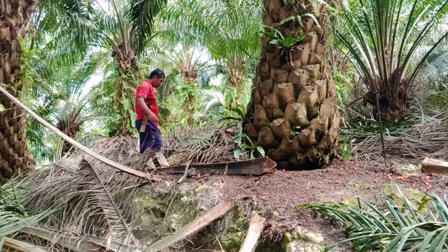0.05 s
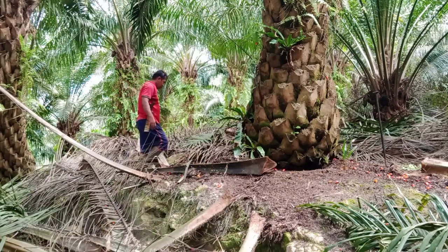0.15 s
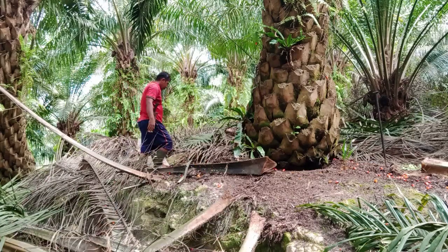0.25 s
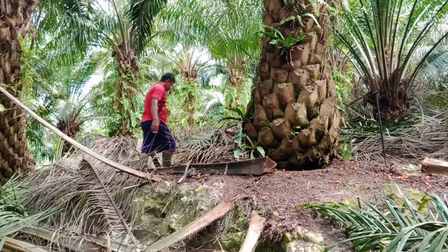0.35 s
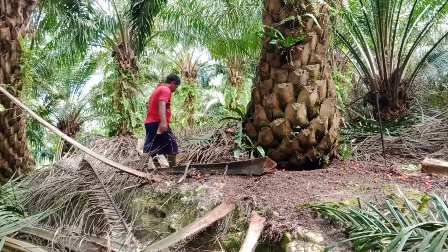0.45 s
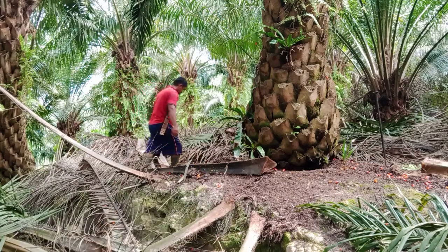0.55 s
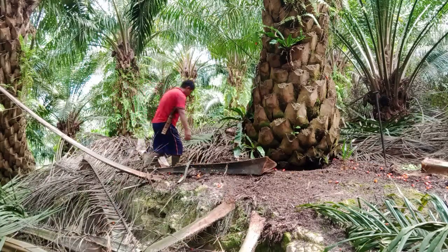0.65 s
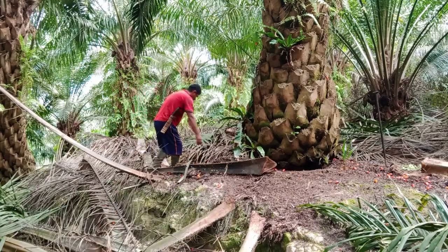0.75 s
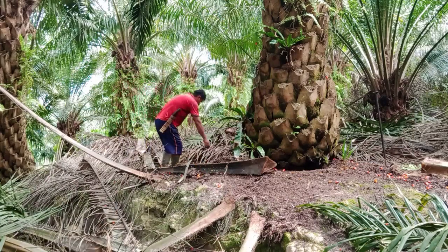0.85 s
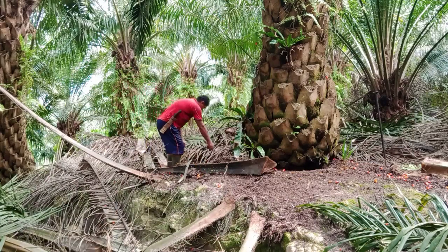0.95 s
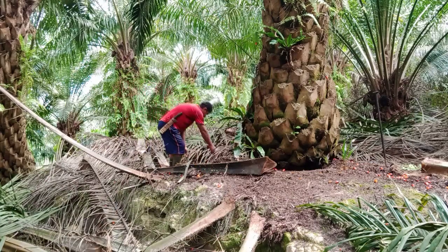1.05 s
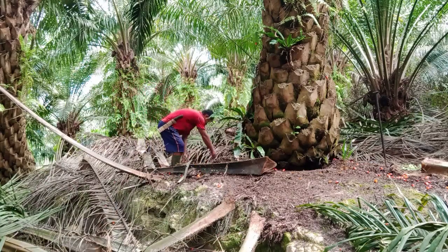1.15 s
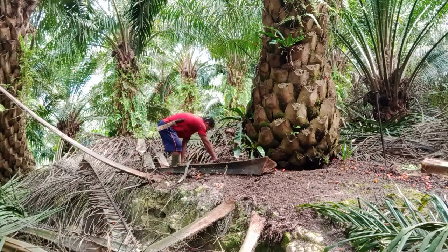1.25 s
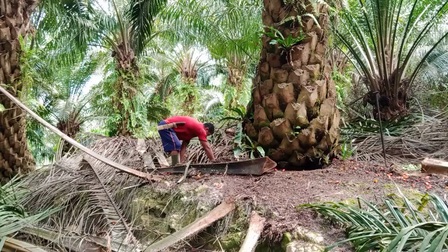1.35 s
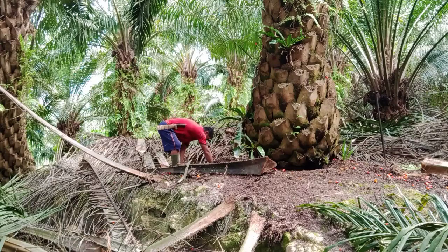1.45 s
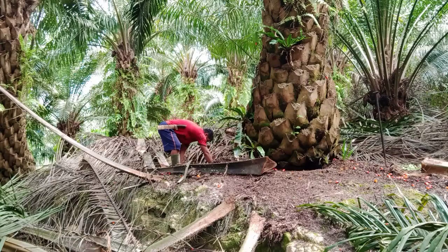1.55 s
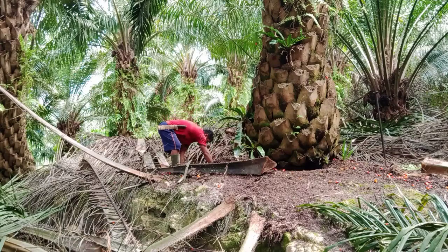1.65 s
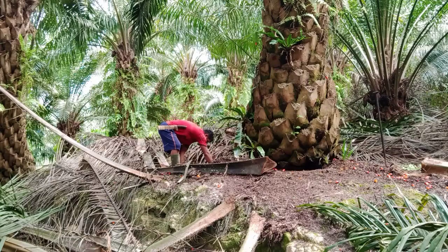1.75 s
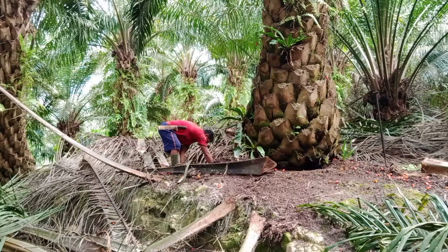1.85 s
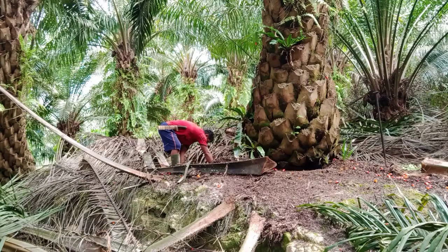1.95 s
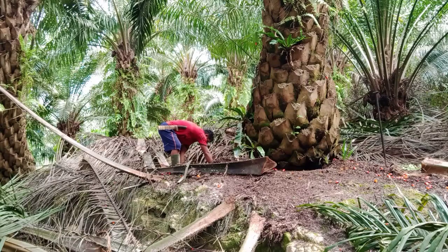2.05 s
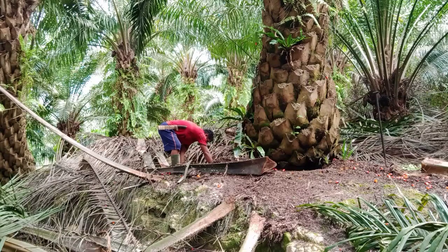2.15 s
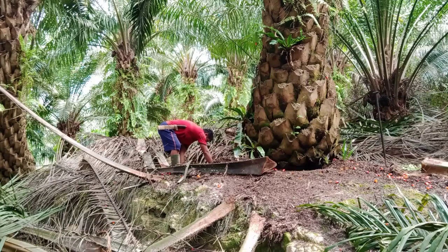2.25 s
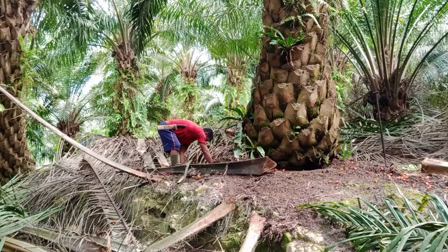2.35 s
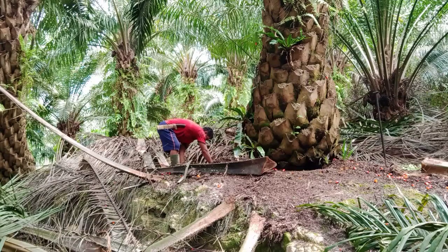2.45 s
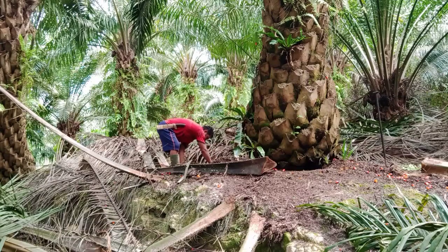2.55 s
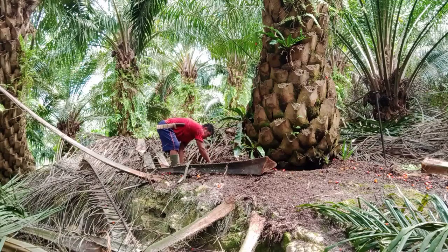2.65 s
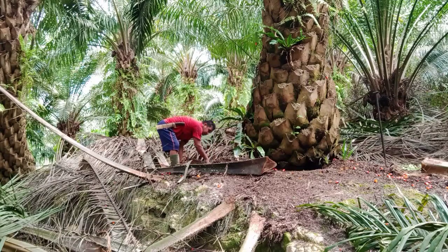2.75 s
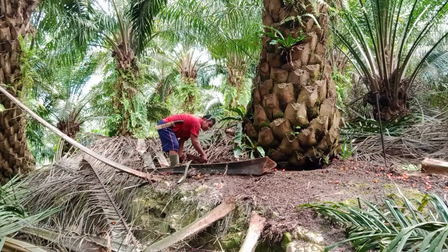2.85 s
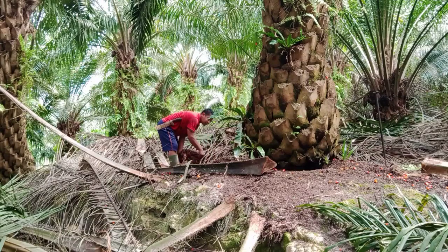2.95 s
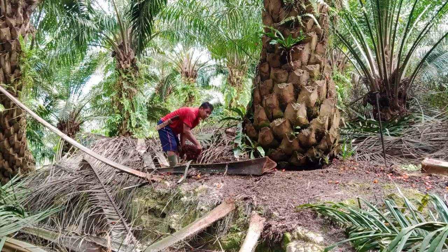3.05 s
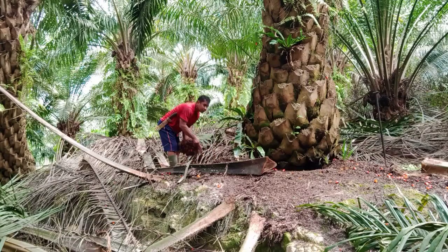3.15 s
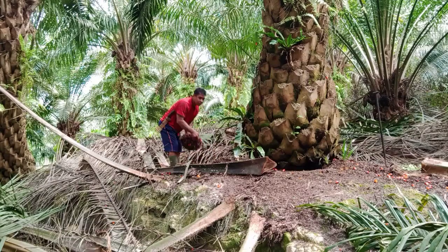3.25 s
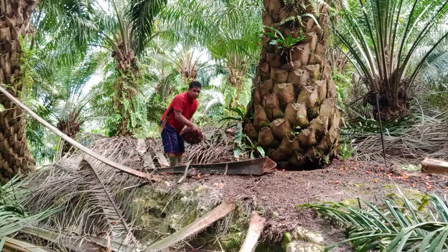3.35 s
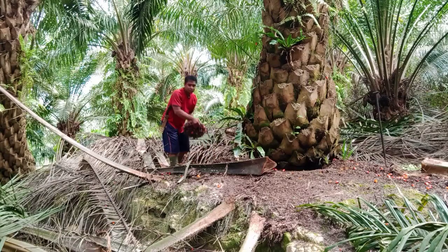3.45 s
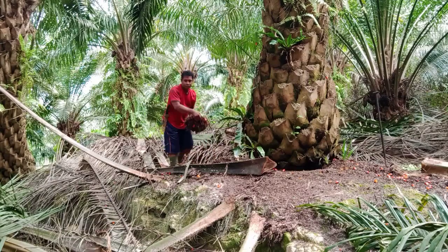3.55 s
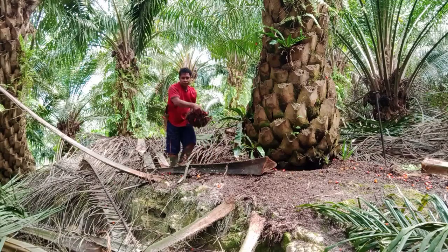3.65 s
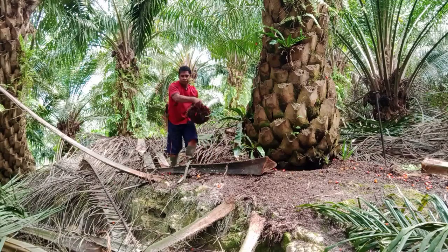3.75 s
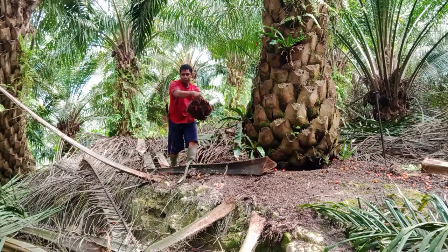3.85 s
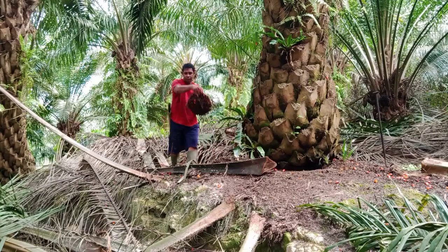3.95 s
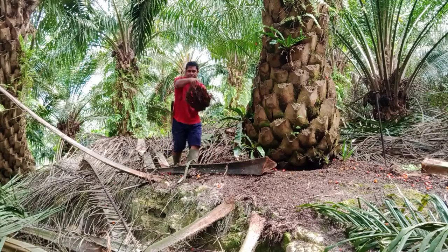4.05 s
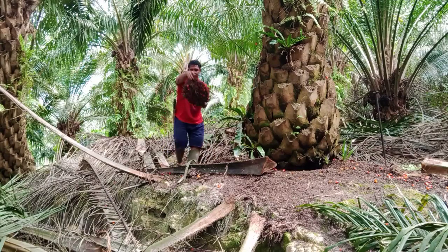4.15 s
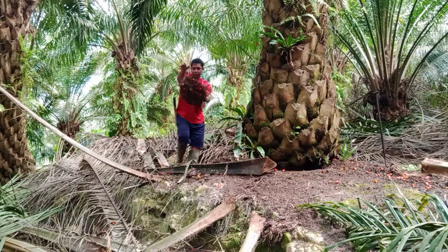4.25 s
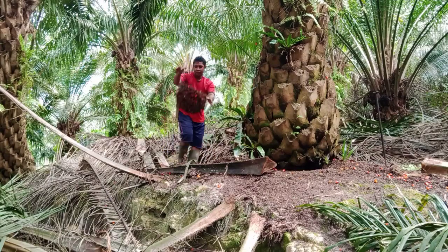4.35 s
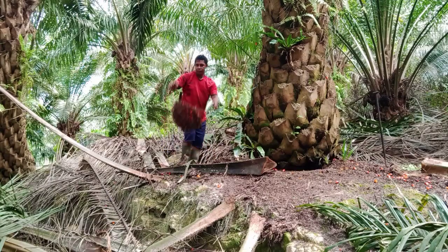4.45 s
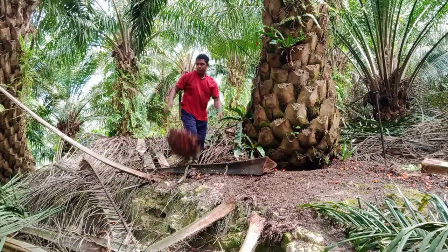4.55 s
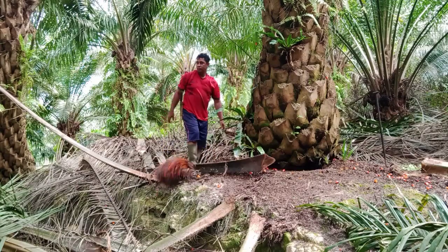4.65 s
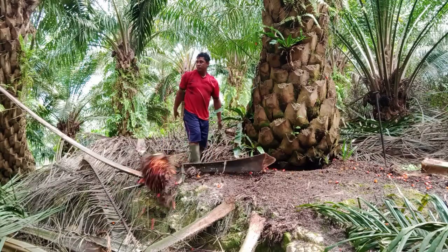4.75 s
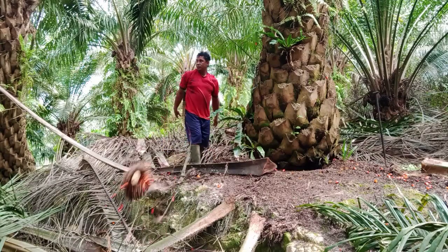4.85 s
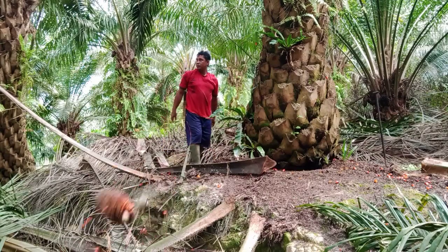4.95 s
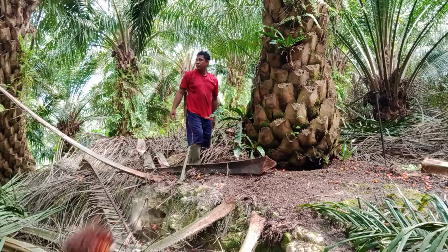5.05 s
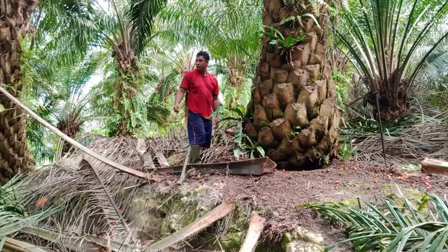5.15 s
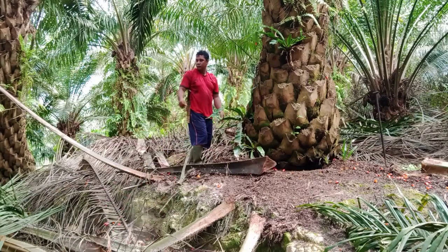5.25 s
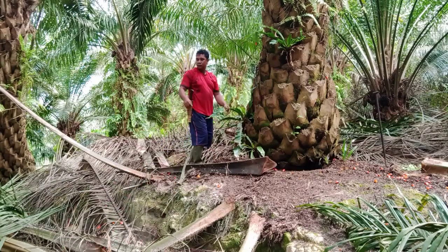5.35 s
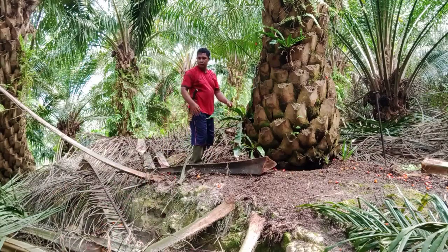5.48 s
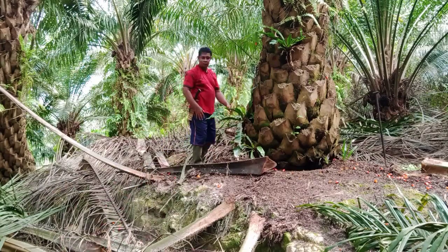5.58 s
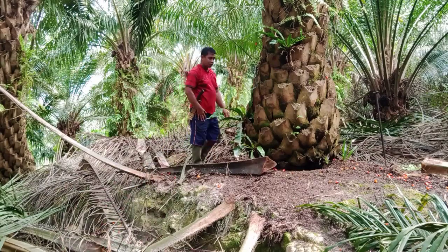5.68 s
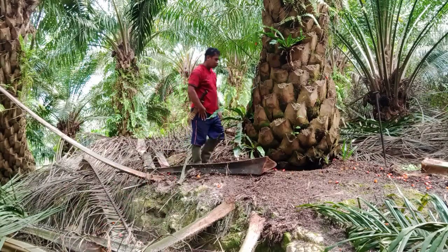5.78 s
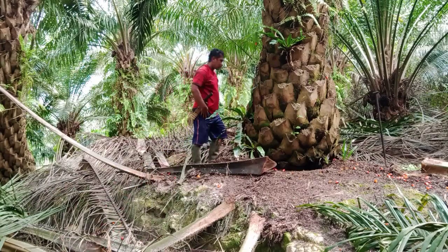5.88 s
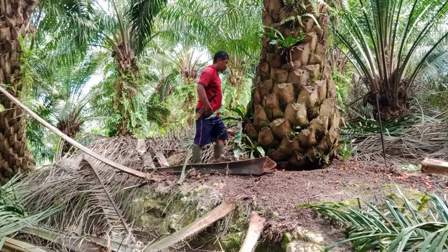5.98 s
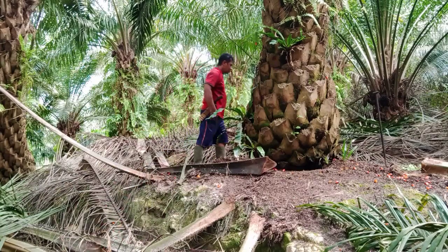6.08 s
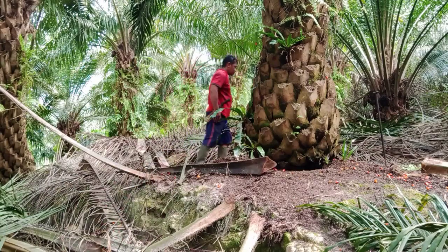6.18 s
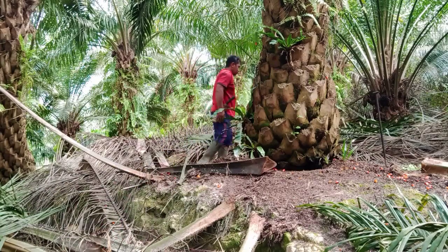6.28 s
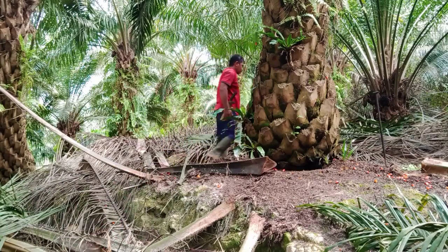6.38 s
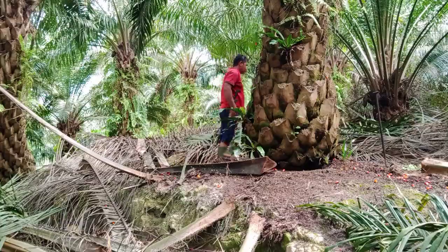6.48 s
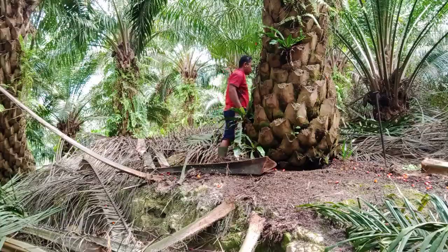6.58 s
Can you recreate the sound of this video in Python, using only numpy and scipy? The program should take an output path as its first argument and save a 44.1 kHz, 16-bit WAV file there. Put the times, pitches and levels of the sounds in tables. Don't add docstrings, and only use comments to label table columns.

```python
import sys
import numpy as np
from scipy import signal
from scipy.fft import rfft, irfft, next_fast_len
from scipy.io import wavfile
from scipy.ndimage import uniform_filter1d

SR = 44100
rng = np.random.default_rng(int(sys.argv[2]) if len(sys.argv) > 2 else 0)


def transcribe(u):
    v = np.clip(np.atleast_2d(u).T, -1, 1)
    q = np.round(v * 32767).astype(np.int16)
    wavfile.write(sys.argv[1], SR, q)


def nominal_scale(level):
    x = np.asarray(level, float) / 20
    return 10 ** x


N = 291942


def unit(x):
    return x / np.sqrt(np.mean(x ** 2) + 1e-20)


def along(points, hz):
    f, v = np.transpose(points)
    return np.interp(np.log(hz + 1), np.log(f + 1), v)


def coloured(x, spectrum):
    m = next_fast_len(N + 8192)
    hz = np.fft.rfftfreq(m, 1 / SR)
    inside = (hz > 0.8 * spectrum[0][0]) & (hz < 1.1 * spectrum[-1][0])
    return unit(irfft(rfft(x, m) * nominal_scale(along(spectrum, hz)) * inside, m)[:N])


def patchy(gain, size=5):
    z = signal.stft(rng.standard_normal(N), nperseg=512)[2]
    field = uniform_filter1d(rng.standard_normal(z.shape), size=size, axis=0)
    field = uniform_filter1d(field, size=24, axis=1)
    return signal.istft(z * gain(unit(field)), nperseg=512)[1][:N]


def air():
    # f/Hz, level/dB
    air_spectrum = [(20, -18), (44, -1.5), (86, -2.5), (160, -6), (974, -13), (2480, -10), (3300, -11),
                    (3860, -13), (4990, -20), (6150, -24), (6900, -21), (7500, -41)]
    # f/Hz, level/dB
    hiss_spectrum = [(5000, -25.5), (6500, -13.5), (9500, -17), (12500, -20), (15600, -13.5)]
    treble = np.clip(np.arange(257)[:, None] / 20 - 0.5, 0, 1)
    stir = patchy(lambda field: nominal_scale(3.1 * treble * field), size=2)
    drone = nominal_scale(-76.5 + 8.5) * coloured(stir, air_spectrum)
    return drone + nominal_scale(-89.5) * coloured(rng.standard_normal(N), hiss_spectrum)


def cicada():
    # f/Hz, level/dB
    tymbal_spectrum = [(3880, -41), (6600, -22.5), (7210, 0), (7680, 4.5), (8110, 0), (8550, -10.5),
                       (8810, -22.5), (9200, -28.5), (12000, -70), (20200, -120)]
    # f/Hz, level/dB
    octave_spectrum = [(13300, -48), (14100, -20), (14800, 1), (15300, 2.5), (15600, -4)]
    rib_levels = [
        1.5,
        -8,
        -7.5,
        8.5,
    ]
    clicks_per_s = 91.8
    turn = np.arange(N) * clicks_per_s / SR
    within = turn % 1
    buckle_in = np.exp(-within / 0.21)
    pop_out = 0.33 * np.exp(-((within - 0.42) % 1) / 0.055)
    beat = unit((buckle_in + pop_out) * nominal_scale(np.array(rib_levels)[turn.astype(int) % 4]))
    body = coloured((1 + 0.22 * beat) * rng.standard_normal(N), tymbal_spectrum)
    octave = coloured((1 + 0.87 * beat) * rng.standard_normal(N), octave_spectrum)
    return nominal_scale(-65 + 0.64) * (body + nominal_scale(-17.5) * octave)


def crackle(per_s, spread_db, t60, share):
    flares = 0
    for zone_hz in (250, 700, 1500, 2400, 3600, 5500, 11000):
        when = rng.random(N)
        size = np.minimum(rng.exponential(1, N), 2.5)
        clump = nominal_scale(6 * unit(uniform_filter1d(rng.standard_normal(N), size=2000)))
        breaks = (when < clump * per_s / SR) * nominal_scale(spread_db * size)
        flare = signal.lfilter([1], [1, -nominal_scale(-60 / (t60 * SR))], breaks)
        zone = signal.iirpeak(zone_hz, 1.3, SR)
        flares = flares + np.sqrt(zone_hz) * unit(signal.lfilter(*zone, flare * rng.standard_normal(N)))
    bed = patchy(lambda field: nominal_scale(1.4 * field))
    share = np.clip(share, 0, 1)
    return np.sqrt(share) * unit(flares) + np.sqrt(1 - share) * unit(bed)


def litter():
    # f/Hz, level/dB
    leaflet_spectrum = [(470, -32), (800, -21), (1100, -5), (1340, -2.5), (1950, 1), (3550, 0),
                        (5430, -9.5), (7640, -12.5), (9500, -24), (12400, -103), (20900, -120)]
    stem_spectrum = [(200, -15), (320, -4), (550, -4), (850, -4.5), (1150, -10)]
    ground_spectrum = [(30, -63.5), (70, -4.5), (140, 6.5), (260, 0), (380, -28.5)]
    dust_spectrum = [(8000, -21), (9500, -2), (12500, -1.5), (15700, 6)]
    # t/s of full force, force/dB, rise/(dB/s), fall/(dB/s), weight on the stems/dB
    boot_presses = [(0.015, -39.5, 98, 105, 3), (0.11, -48, 100, 64, -2), (0.206, -37, 230, 104, 2),
                    (0.298, -37.5, 122, 37.5, 3.5), (0.444, -43, 350, 34.5, 8.5), (0.66, -51.5, 99, 37, 3),
                    (0.8, -58.5, 58, 42, -10), (0.93, -57, 97, 72.5, -2), (1.08, -56, 200, 64, -2),
                    (1.156, -55.5, 150, 55, 4), (1.3, -58, 43, 32, -15), (1.445, -51.5, 307, 66, -2),
                    (1.58, -53.5, 61, 36, -24), (1.73, -58.5, 13, 287, -32), (1.85, -80, 60, 60, -25),
                    (4.052, -62, 3002, 200, -10), (4.08, -61, 300, 35, -21)]
    bunch_presses = [(4.688, -33, 4002, 126, 6), (4.888, -49, 176, 118, 10.5), (4.94, -46, 500, 72, -6),
                     (5.06, -56, 142, 113, 14), (5.115, -43, 1494, 412, -19), (5.175, -43.5, 1497, 51, 9),
                     (5.258, -30.5, 218, 172, 4.5), (5.299, -39, 400, 98, 12.5), (5.42, -46, 67.5, 48.5, 3),
                     (5.537, -45, 797, 172, 11.5), (5.65, -56.5, 57, 25, 0.5), (5.89, -54.5, 28, 157, 0),
                     (5.97, -60, 60.5, 22, -12), (6.15, -62, 30, 25, -18), (6.36, -59, 30, 30, -26),
                     (6.56, -65.5, 41, 24, -7)]
    stems_db, ground_db, dust_db = -11.5, -21.5, -19.5
    ground_grows = 1.13
    dust_grows = 0.27
    stems_settle = 1.49

    fine = crackle(per_s=170, spread_db=3.5, t60=0.007, share=0.32)
    coarse = patchy(lambda field: nominal_scale(2.5 * field))
    parts = [coloured(fine, leaflet_spectrum), coloured(coarse + 0.81 * unit(fine), stem_spectrum),
             coloured(coarse, ground_spectrum), coloured(fine, dust_spectrum)]

    power = 0
    t = np.arange(0, N + 32, 32) / SR
    for s, force_db, rise, fall, weight_db in [*boot_presses, *bunch_presses]:
        swell_db = abs(rise) * np.minimum(t - s, 0)
        fade_db = abs(fall) * np.maximum(t - s, 0)
        light_db = force_db + swell_db - fade_db
        heavy_db = force_db + swell_db - stems_settle * fade_db
        power = power + nominal_scale([light_db,
                             heavy_db + stems_db + weight_db,
                             heavy_db + ground_db + ground_grows * weight_db,
                             light_db + dust_db + dust_grows * (force_db + 31.5)]) ** 2
    levels = np.sqrt(power)
    return nominal_scale(-4.5) * sum(np.interp(np.arange(N) / SR, t, level) * part for level, part in zip(levels, parts))


def rubs():
    # t/s, length/s, f/Hz, level/dB
    slides = [(0.869, 0.076, 565, -70), (0.953, 0.086, 332, -79), (1.07, 0.045, 720, -73),
              (1.09, 0.034, 480, -73), (1.186, .06, 840, -71), (1.25, .07, 1050, -68), (.64, .03, 600, -58),
              (.72, .05, 1000, -60), (5.88, .04, 600, -64), (.02, .12, 110, -64), (1.216, 0.066, 590, -84),
              (1.433, 0.05, 690, -67), (1.445, 0.071, 334, -68.5), (1.55, 0.052, 590, -70.5),
              (1.72, .05, 330, -75), (5.563, 0.027, 900, -58.5), (5.657, 0.15, 239, -71),
              (5.779, 0.083, 950, -66), (5.827, 0.088, 343, -68.5), (5.97, 0.025, 320, -67),
              (5.952, 0.07, 1170, -74.5), (6.047, 0.086, 545, -73.5), (6.12, 0.073, 400, -71.5),
              (6.22, .04, 1050, -75.5)]
    width = 1.17
    out = np.zeros(N + SR)
    t = np.arange(SR // 4) / SR
    for (s, long, hz, db), noise in zip(slides, rng.standard_normal((len(slides), len(t)))):
        band = signal.butter(2, [hz / width, hz * width], "bandpass", fs=SR)
        contact = np.clip(np.minimum(t, long - t) / 0.01, 0, 1)
        out[round(s * SR):][:len(t)] += nominal_scale(db) * unit(signal.lfilter(*band, noise)) * contact
    return out[:N]


def snaps():
    # t/s, peak level/dB, ring f/Hz, sharp edge re peak/dB, sometimes t60/s
    step_snaps = [(0.0548, -29, 2000, -36), (0.0734, -40, 2380, -43), (0.0833, -25, 3420, -39),
                  (0.1544, -20.5, 4220, -29), (0.1885, -27, 2200, -41), (0.1994, -27, 3180, -40),
                  (0.2072, -20, 2880, -38), (0.2204, -30, 2250, -35), (0.237, -34, 2470, -33),
                  (0.2755, -22.5, 2960, -36), (0.3022, -15.5, 3670, -22), (0.3134, -37, 3530, -36),
                  (0.4241, -20, 3270, -23), (0.448, -30, 3360, -29), (0.4968, -31, 2400, -32),
                  (0.5242, -28, 2630, -31), (0.593, -37, 2700, -34), (0.635, -42, 2600, -23),
                  (0.6544, -33.5, 1550, -21)]
    shuffle_snaps = [(0.8954, -55, 2280, -30), (0.9203, -47, 2810, -30), (0.9434, -42, 3640, -23),
                     (1.0124, -51, 3140, -22), (1.056, -46.5, 2020, -15), (1.0765, -48, 2130, -38),
                     (1.1054, -53, 3200, -38), (1.1254, -46, 2180, -42), (1.1454, -44, 1880, -41),
                     (1.1942, -51, 3200, -28), (1.2191, -50, 2100, -34), (1.2421, -45, 2230, -36),
                     (1.3445, -45, 2750, -30), (1.3728, -48, 2630, -17.5), (1.419, -48, 2570, -35),
                     (1.4345, -36, 1930, -37), (1.57, -37, 2110, -22), (1.5854, -41, 2330, -28),
                     (1.6078, -40, 2350, -25), (1.6777, -39, 2440, -25), (1.7274, -57, 2300, -19),
                     (1.848, -49, 3030, -31)]
    stalk_snaps = [
        (4.0482, -43, 2800, -24, .014),
        (4.048, -54, 1450, -45, .025),
        (4.0481, -47, 3900, -30, .012),
        (4.0483, -53, 5600, -35, .01),
    ]
    bunch_snaps = [(4.6867, -25, 2780, -30, .012), (4.6954, -21, 1130, -45, .015),
                   (4.6972, -22, 1900, -19, .008), (4.706, -17, 2300, -18, .008),
                   (4.7098, -20, 1510, -21, .01), (4.7174, -23.5, 1600, -37), (4.8583, -37, 1230, -52),
                   (4.8692, -36, 2060, -45), (4.8859, -41, 1320, -38.5), (4.8878, -36, 1520, -36),
                   (4.8985, -31, 2140, -38), (4.9365, -30, 1730, -35), (4.943, -31, 2890, -18),
                   (4.9518, -40, 2560, -30), (4.9797, -34.5, 3870, -40), (5.0255, -36, 2486, -38),
                   (5.1123, -36.5, 1450, -36), (5.1444, -38.5, 2910, -40), (5.17, -38.5, 2100, -40),
                   (5.1864, -29.5, 3260, -41), (5.214, -35, 1620, -40)]
    wake_snaps = [(5.535, -35, 2910, -37), (5.696, -55, 2660, -19), (5.777, -34.5, 2070, -33),
                  (5.853, -46, 2240, -33), (5.8756, -44, 1870, -43), (5.908, -47, 1940, -31),
                  (6.054, -51.5, 1620, -33), (6.1052, -44, 3720, -41), (6.145, -55.5, 1900, -36),
                  (6.171, -47, 2920, -20), (6.2365, -51, 1820, -35), (6.325, -49, 3710, -20),
                  (6.366, -46, 2980, -37), (6.4215, -51.5, 1340, -39), (6.532, -47, 2230, -36),
                  (6.5662, -55, 2220, -36)]
    second_voices = [
        (0.0545, -21, 4300, -30),
        (0.206, -23.5, 4100, -34),
        (0.275, -26, 5040, -30),
        (0.4235, -25, 4870, -30),
        (4.8987, -35.5, 3740, -40),
        (5.214, -29, 4840, -39),
    ]
    crash_snaps = [(5.2445, -18.5, 2240, -44, 0.023), (5.247, -23, 2630, -45.5, 0.014),
                   (5.2535, -19, 2430, -45, .012), (5.259, -18.5, 2880, -48.5, .008),
                   (5.2629, -6, 2300, -44, .007), (5.263, -16.5, 1730, -49, 0.014),
                   (5.265, -23, 3000, -52, 0.02), (5.2745, -28.5, 2300, -34.5, 0.01),
                   (5.2922, -14, 3290, -45, .012), (5.2918, -26, 4700, -48, 0.0068),
                   (5.297, -24.5, 3000, -43, .008), (5.3006, -20, 3000, -36, 0.0066),
                   (5.3008, -16, 3110, -45.5, 0.014), (5.3015, -17.5, 1454, -49, 0.014),
                   (5.306, -21, 2230, -44, .014), (5.3157, -29, 2370, -45, .012),
                   (5.338, -32, 1500, -45, 0.01), (5.349, -31, 3180, -45, 0.015)]
    loose_snaps = [(0.241, -34, 3000, -20), (0.296, -42, 3000, -21), (0.316, -27, 2800, -31),
                   (0.155, -29, 6000, -34), (0.302, -23, 2300, -37), (4.852, -38, 2600, -28),
                   (4.881, -38, 1500, -40), (4.905, -42.5, 3500, -25), (4.93, -36.5, 2300, -38),
                   (4.955, -45, 1800, -36), (4.983, -43, 2200, -23), (5.028, -41, 1400, -30.5),
                   (5.099, -46.5, 2160, -30), (5.125, -41, 2500, -37), (5.147, -45.5, 1800, -39),
                   (5.54, -34, 1300, -40), (5.57, -41, 1100, -45), (1.468, -49, 1500, -40),
                   (1.484, -45, 1600, -40), (1.633, -45, 2000, -32), (1.699, -53, 2200, -34)]
    more_wake_snaps = [(5.6611, -48, 1840, -30), (5.6956, -47, 2730, -30), (5.7484, -49, 2510, -30),
                       (5.7754, -44, 2120, -30), (5.9091, -45, 1750, -30), (6.0533, -54, 1570, -30),
                       (6.1056, -51, 3810, -30), (6.148, -57, 1910, -30), (6.17, -52, 2870, -30),
                       (6.1954, -57, 2970, -30), (6.2363, -55, 1820, -30), (6.3236, -48, 2260, -30),
                       (6.3655, -48, 3010, -30), (6.5327, -58, 2150, -30)]
    tip_snaps = [(0.6352, -40, 3820, -28), (0.7364, -47, 3310, -28), (0.8028, -46, 3860, -28),
                 (0.8337, -44, 3940, -28), (0.8941, -49, 3640, -28), (0.9215, -50, 3000, -28),
                 (0.944, -48, 3560, -28), (0.9759, -49, 3930, -28), (1.0288, -50, 3000, -28),
                 (1.0542, -45, 3790, -28), (1.0767, -50, 3380, -28), (1.151, -53, 4470, -28),
                 (1.151, -48, 3560, -28), (1.344, -54, 3430, -28), (1.366, -49, 3270, -28),
                 (1.4154, -47, 3570, -28), (1.4343, -45, 3860, -28), (1.4593, -50, 3250, -28),
                 (1.569, -41, 3530, -28), (1.6074, -48, 3190, -28), (1.6773, -46, 3030, -28),
                 (1.7267, -50, 3040, -28)]
    usual_t60 = 0.0063
    clean_break = 0.43
    edge_dulls = 0.15
    side_modes = 0.57

    breaks = [*step_snaps, *shuffle_snaps, *stalk_snaps, *bunch_snaps, *wake_snaps, *second_voices,
              *crash_snaps, *loose_snaps, *more_wake_snaps, *tip_snaps]
    out = np.zeros(N + SR)
    t = np.arange(SR // 16) / SR
    rough = rng.standard_normal((len(breaks), 3, len(t)))
    spread = 0.2 * rough[:, 0, -3:]
    woody = signal.butter(2, [350, 950], "bandpass", fs=SR)
    sharp = signal.butter(1, [3500, 8500], "bandpass", fs=SR)
    peak = lambda x: x / np.abs(x).max()
    for (s, db, hz, edge_db, *own_t60), noise, scatter in zip(breaks, rough, spread):
        t60 = own_t60[0] if own_t60 else usual_t60 * nominal_scale(-clean_break * (db + 18))
        fade = nominal_scale(-60 * t / np.clip(t60, 0.003, 0.05))

        side = sum(np.sin(2 * np.pi * hz * ratio * t) for ratio in np.exp(scatter))
        modes = np.sin(2 * np.pi * hz * t) + side_modes * side
        modes = modes * fade ** 0.82 * (1 - np.exp(-t / 0.00047))

        leaflet = signal.butter(3, [hz / 2.0, hz * 1.676], "bandpass", fs=SR)
        crack = signal.lfilter(*leaflet, (noise[0] + 4 * (t == 0)) * fade)
        edge = signal.lfilter(*sharp, (noise[1] + 3 * (t == 0)) * fade ** 4.5)
        knock = signal.lfilter(*woody, noise[2] * fade ** 3.3)
        knock_db = -22 + 3 * noise[2, -1]

        sound = peak(0.75 * peak(modes) + peak(crack))
        sound = sound + nominal_scale(edge_db + 18 - edge_dulls * (db + 31.0)) * peak(edge)
        sound = sound + nominal_scale(knock_db - 2.5) * peak(knock)
        out[round(s * SR):][:len(t)] += nominal_scale(db - 1.85) * sound
    return out[:N]


def grove(x):
    # f/Hz, t60/s
    grove_t60 = [(300, 0.18), (3000, 0.38), (12000, 0.21)]
    hz, t, z = signal.stft(rng.standard_normal(SR // 3), SR, nperseg=256)
    tail = signal.istft(z * nominal_scale(-60 * t / along(grove_t60, hz)[:, None]), SR, nperseg=256)[1]
    return signal.fftconvolve(np.pad(x, (200, 0)), tail / np.linalg.norm(tail))[:N]


def thuds():
    # t/s, peak level/dB, f/Hz, t60/s
    stem_blows = [(0.655, -34.5, 770, 0.011), (0.741, -40, 796, 0.023), (3.78, -66, 557, 0.046),
                  (1.147, -48, 560, 0.021), (4.048, -63, 420, 0.11), (4.074, -63, 497, 0.052),
                  (4.682, -30.5, 560, 0.031), (4.693, -22, 556, 0.033), (4.697, -30.5, 478, 0.045),
                  (5.17, -42, 531.6, 0.05), (4.704, -22.5, 509, 0.029), (4.71, -19.5, 460, 0.018),
                  (4.716, -30, 626, 0.012), (4.761, -56, 470, 0.025), (5.052, -54, 170, 0.1),
                  (5.247, -38.5, 295.5, 0.2), (5.535, -26, 150, 0.029), (5.543, -35, 146, 0.032),
                  (5.56, -35.5, 134, 0.034), (5.646, -49.5, 240, 0.064), (5.864, -62, 370, 0.067)]
    soil_blows = [
        (4.049, -61, 110, 0.13),
        (4.689, -42, 105, 0.21),
        (4.7, -32.5, 394, 0.061),
        (5.254, -43.5, 106, 0.14),
        (5.311, -43, 96, 0.1),
    ]
    out = np.zeros(N + SR)
    t = np.arange(SR // 4) / SR
    for s, db, hz, t60 in [*stem_blows, *soil_blows]:
        cycles = hz * (0.615 * t + 0.317 * 0.0317 * (1 - np.exp(-t / 0.03)))
        swell = 1 - np.exp(-t / 0.0012)
        fade = nominal_scale(db + 2.5 - 60 * t / t60)
        out[round(s * SR):][:len(t)] += fade * swell * np.sin(2 * np.pi * 1.21 * cycles)
    return out[:N]


def settling():
    # t/s, peak level/dB, f/Hz, length/s
    far_ticks = [
        (1.851, -56.5, 3080, 0.0043),
        (2.07, -63, 4000, 0.011),
        (2.2994, -70, 3070, 0.014),
        (2.695, -68, 3240, 0.012),
        (3.255, -62, 3220, 0.011),
        (3.7794, -69, 3360, 0.015),
    ]
    t = np.arange(N) / SR
    out = np.zeros(N)
    for s, db, hz, long in far_ticks:
        bump = np.exp(-((t - s - long / 2) / (long / 2)) ** 2)
        out += nominal_scale(db) * bump * np.sin(2 * np.pi * hz * t)
    return out


def cricket():
    # t/s, length/s, level/dB
    chirp_bouts = [
        (1.9, .28, -85),
        (2.24, 0.1, -83),
        (2.39, .55, -79),
        (3.1, 0.32, -85),
        (3.74, .26, -83),
        (4.28, 0.055, -88),
        (4.39, 0.34, -80),
        (6.05, 0.16, -86),
        (6.31, .3, -81.5),
    ]
    # f/Hz, level/dB
    chirp_spectrum = [(5050, -20.5), (5300, 8.5), (5650, 2.5), (5950, -25)]
    edge_s = 0.07
    t = np.arange(N) / SR
    level = 0
    for s, long, db in chirp_bouts:
        level = level + nominal_scale(db) * np.clip(np.minimum(t - s, s + long - t) / edge_s + 0.5, 0, 1)
    return nominal_scale(0.5) * level * coloured(rng.standard_normal(N), chirp_spectrum)


def suppress(x, depth_db, open_db, soft_db):
    top_hz = 15500
    hz, _, z = signal.stft(x, SR, nperseg=1024)
    power = uniform_filter1d(np.abs(z) ** 2, size=5, axis=0)
    power = np.abs(uniform_filter1d(power, size=6, axis=1))
    usual = np.percentile(power, 25, axis=1, keepdims=True)
    rise_db = 10 * np.log10(power / usual + 1e-9)
    shut = 1 / (1.5 + np.exp(np.clip((rise_db - open_db) / soft_db, -30, 30)))
    reach = np.clip((6800 - hz[:, None]) / 2400, 0, 1)
    gain = nominal_scale(-depth_db * shut * reach) * (hz[:, None] < top_hz)
    return signal.istft(z * gain, SR, nperseg=1024)[1][:N]


def scene():
    hits = snaps() + thuds()
    answered = hits + nominal_scale(-10.0) * grove(hits)
    return (air() + cicada() + litter() + rubs() + answered + settling() + cricket())[None]


def roll_off(x):
    return signal.sosfilt(signal.butter(12, 16510, fs=SR, output="sos"), x)


def record(dry):
    heard = signal.lfilter(*signal.butter(2, 68.7, "highpass", fs=SR), dry[0])
    quiet = suppress(heard, depth_db=13, open_db=5.5, soft_db=1.2)
    return roll_off(quiet[None])


dry = scene()
out = record(dry)
transcribe(out)
```